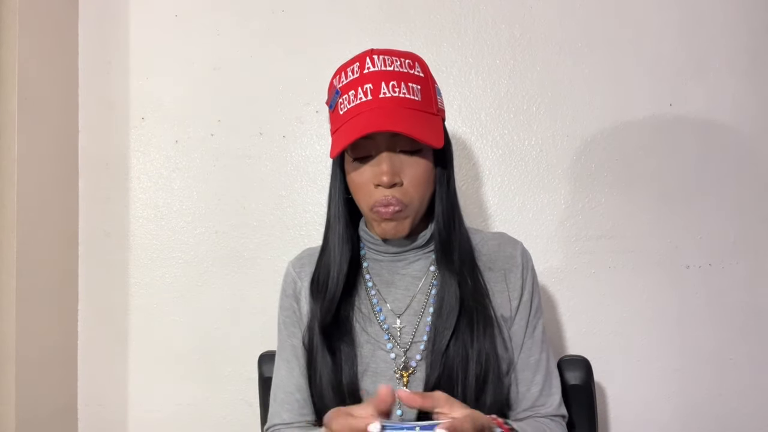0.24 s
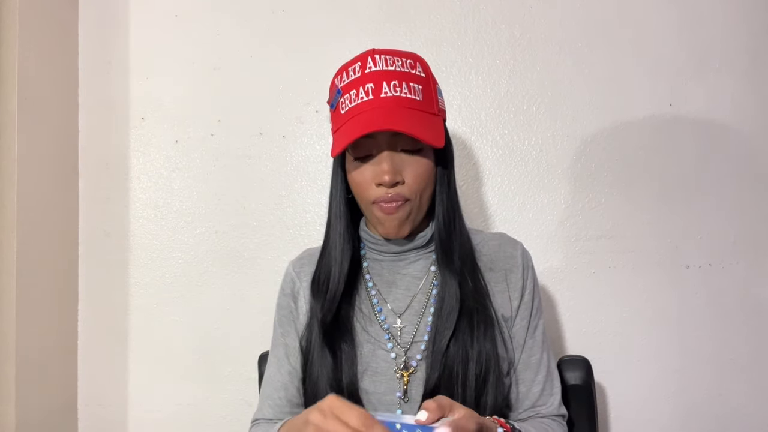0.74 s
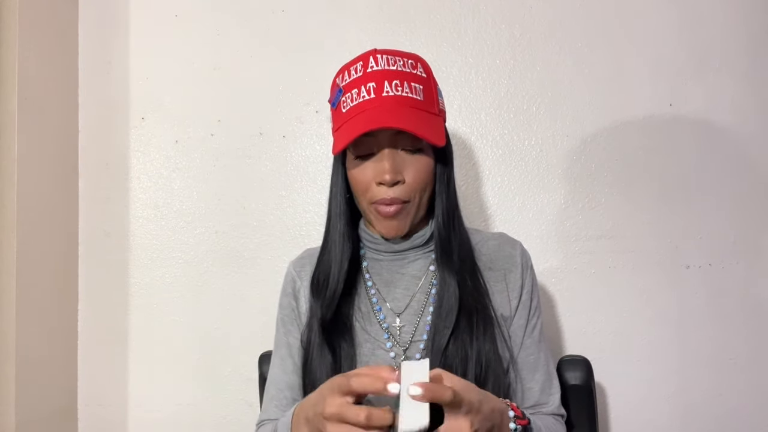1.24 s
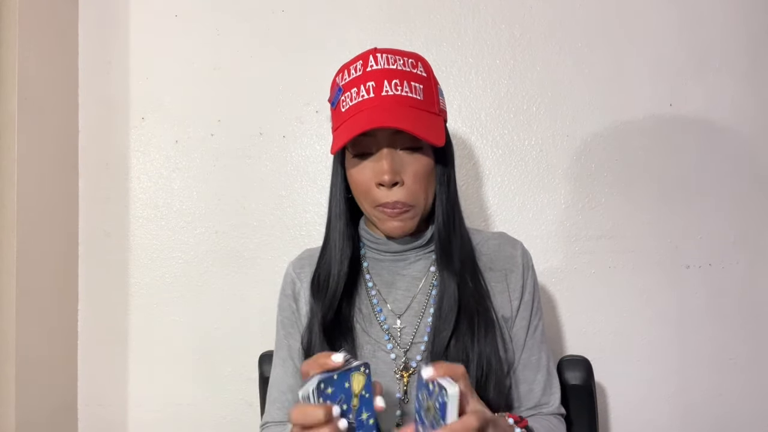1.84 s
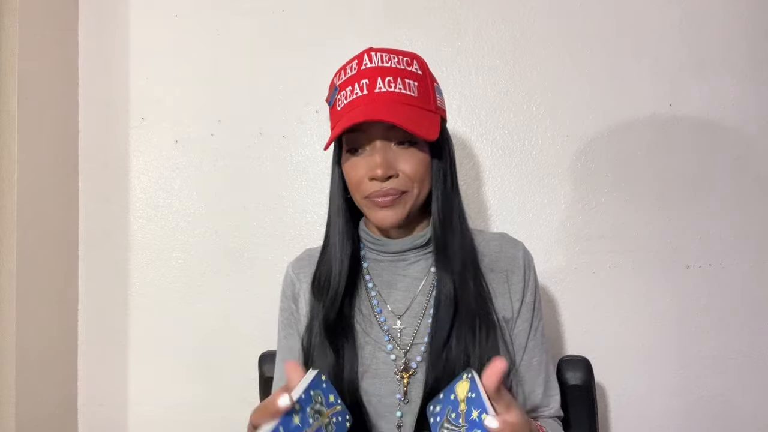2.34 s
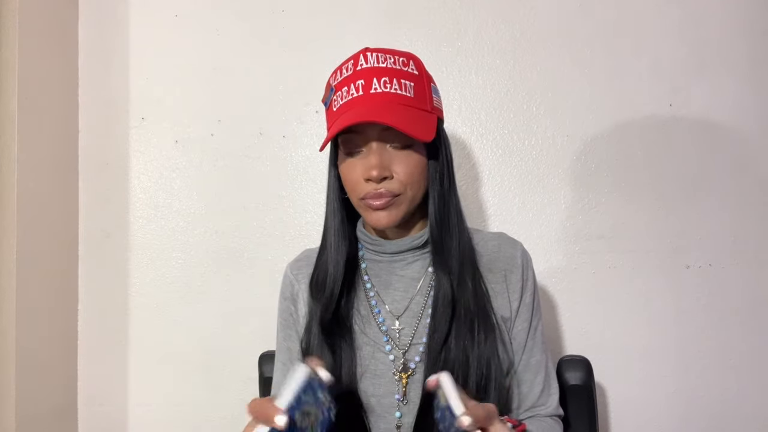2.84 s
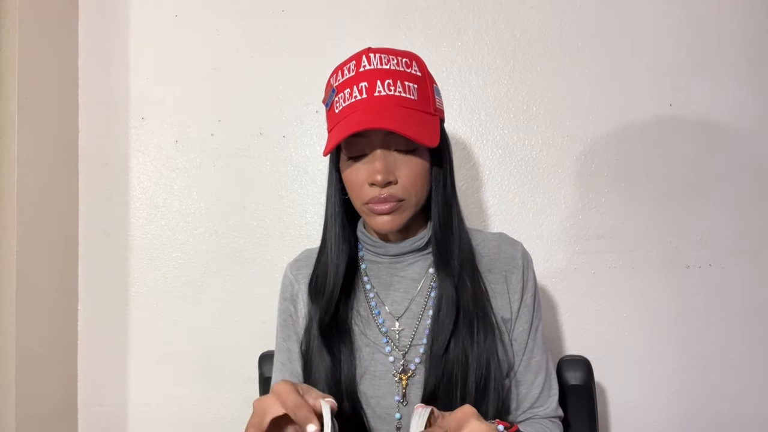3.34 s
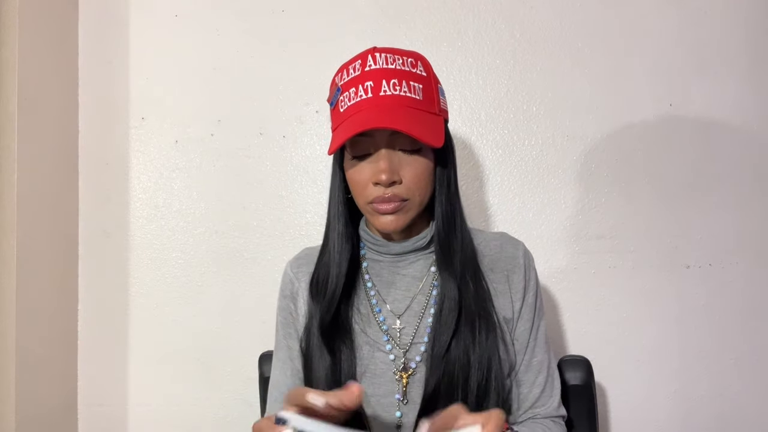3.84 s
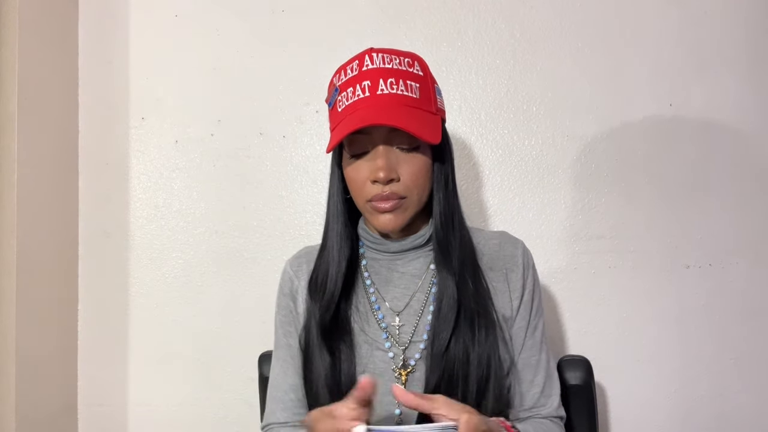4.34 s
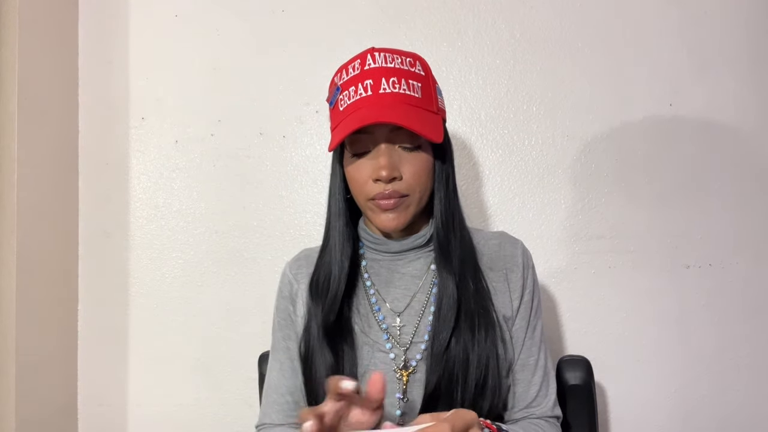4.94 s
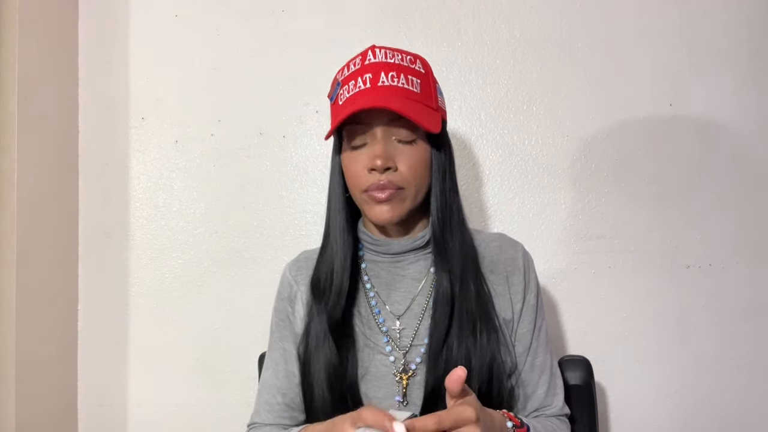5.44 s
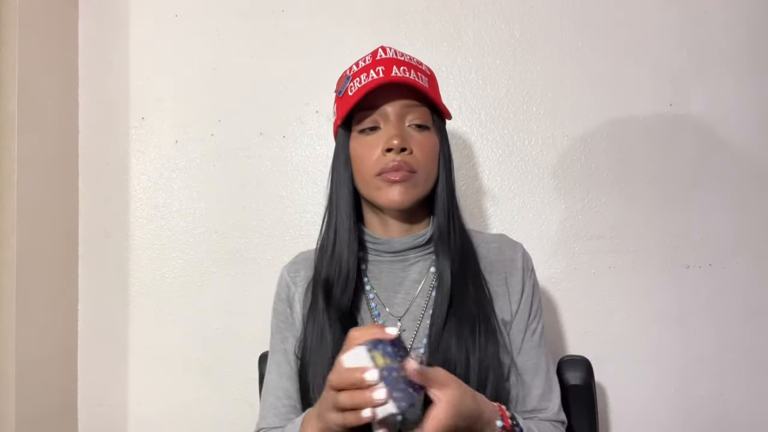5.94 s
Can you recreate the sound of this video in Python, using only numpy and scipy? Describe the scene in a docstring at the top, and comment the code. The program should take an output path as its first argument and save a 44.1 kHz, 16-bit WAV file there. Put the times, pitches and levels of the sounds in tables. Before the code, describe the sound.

A deck of cards is handled on a wooden table in a small quiet room, heard close, slightly right, with a short echo. From 0 to 0.3 seconds, soft muffled pops, light table knocks and a papery hiss; to 0.8, fading slides. From 0.9 to 1.8 only faint ticks and scrapes. At 1.93 a dull knock with a pop, then near silence until 2.95. From 2.98 to 3.75 comes the loudest card passage: rapid irregular snaps, noisy flutters, crisp bright ticks, rushing hiss and brief high squeaks, the table ringing woodily, densest around 3.5 to 3.65. From 3.9 to 4.65, gentler slides, pops and squaring taps. Sparse faint rustles follow, with a small tap at 5.27. At 5.64 a heavy, low double thump hits the table. Around 6.05, a short slide and snap. A low wavering hum, faint rumble and soft hiss continue throughout.

```python
"""Shuffling cards on a table

Hands cut, riffle and square a deck of cards on a wooden table in a small quiet room.
Cards snap with short pops and noisy flutters, edges tick and squeak, and sliding faces hiss.
Blows ring the table top; a wavering hum, a faint rumble and microphone hiss lie underneath.
Two microphone ports a few centimetres apart hear the cards from one side, with a short echo."""
import sys
import numpy as np
from scipy import signal
from scipy.fft import rfft, irfft, next_fast_len
from scipy.io import wavfile
from scipy.ndimage import uniform_filter1d

SR = 44100
rng = np.random.default_rng(int(sys.argv[2]) if len(sys.argv) > 2 else 0)


def wav_out(sig):
    """Save sig, one row per channel (or a flat mono array), as 16-bit PCM at SR to the path in sys.argv[1]."""
    wavfile.write(sys.argv[1], SR, np.round(np.clip(np.atleast_2d(sig).T, -1, 1) * 32767).astype(np.int16))


N = 272979  # length of the scene in samples

# colour of the bending stack of cards: (frequency [Hz], relative level per Hz [dB])
STACK = [(150, -5), (350, -2), (700, -4), (1300, -2.5), (1900, -4), (2600, -9), (4500, -32.5)]
ENDS_DB = -24  # a stroke or squeak is this far below its peak one rise before or one fall after it


def amp(db):
    """Turns decibels into a plain multiplier."""
    return 10 ** (np.asarray(db) / 20)


def evened(x):
    """Scales a signal to an rms level of one."""
    return x / np.sqrt(np.mean(x ** 2) + 1e-20)


def read(points, hz):
    """Reads a table between its points, along a logarithmic frequency scale."""
    f, value = np.transpose(points)
    return np.interp(np.log(hz + 1), np.log(f + 1), value)


def add(mix, s, sound):
    """Adds a sound to the mix, starting at s seconds."""
    part = mix[max(round(s * SR), 0):][:len(sound)]
    part += sound[:len(part)]


def coloured(x, points):
    """Filters x by the levels in the table and scales it to an rms level of one."""
    size = next_fast_len(len(x))
    gain = amp(read(points, np.fft.rfftfreq(size, 1 / SR)))
    return evened(irfft(rfft(x, size) * gain, size)[:len(x)])


def low_hum():
    """A low sine wavers in level and drifts slightly in pitch."""
    # level of the hum: (time [s], level [dB])
    hum_levels = [(0, -50), (.55, -49), (.74, -54), (.8, -62), (.88, -53), (1.9, -50), (2.55, -50),
                  (2.68, -62), (2.8, -52), (2.88, -60), (3., -52), (4., -52), (4.4, -49), (4.8, -55),
                  (5.15, -49.5), (5.55, -54), (6.19, -52)]
    hum_hz, drift_hz = 59.5, 0.34
    t = np.arange(N) / SR
    drift = evened(uniform_filter1d(uniform_filter1d(rng.standard_normal(N), 6000), 6000))
    turns = np.cumsum(hum_hz + drift_hz * drift) / SR
    level = np.sqrt(2) * amp(np.interp(t, *np.transpose(hum_levels)))
    return level * np.sin(2 * np.pi * turns) * amp([[-.5], [.5]])  # a little louder on the right


def quiet_room():
    """Faint low rumble: one noise shared by both ports plus one of each port's own."""
    # colour of the rumble: (frequency [Hz], relative level per Hz [dB])
    rumble_colour = [(12, -87.5), (20, -35), (41, -17.5), (65, -28), (92, -14), (129, -18.5), (177, -27.5),
                     (258, -26), (376, -38), (505, -43), (768, -49.5), (3000, -65), (6600, -120)]
    shared, left, right = (coloured(v, rumble_colour) for v in rng.standard_normal((3, N)))
    return amp(-64.5) * (shared + 1.21 * np.array([left, right]))


def microphone_hiss():
    """Each microphone adds its own steady noise."""
    # colour of the hiss: (frequency [Hz], relative level per Hz [dB])
    hiss_colour = [(1000, -19), (3000, -4.5), (6000, -2.5), (8500, -7), (12000, -2.5), (14500, -19.5)]
    return amp(-84) * np.array([coloured(v, hiss_colour) for v in rng.standard_normal((2, N))])


def gritty(per_s, spread_db, share):
    """Noise that swells with tiny catches of uneven size, as rough surfaces slide."""
    sizes = amp(spread_db * np.minimum(rng.exponential(1, N), 3))
    catches = sizes * (rng.random(N) < per_s / SR)
    swell = evened(signal.lfilter([1], [1, -.97], catches))
    return (1 + share * swell) * rng.standard_normal(N)


def patchy(x):
    """Friction is uneven: patches of the spectrum swell and sink at random."""
    patchy_db = 2.5  # typical size of the swelling and sinking
    z = signal.stft(x, nperseg=256)[2]
    patches = uniform_filter1d(rng.standard_normal(z.shape), size=5, axis=0)
    patches = evened(uniform_filter1d(patches, size=9, axis=1))
    return signal.istft(z * amp(patchy_db * patches), nperseg=256)[1][:N]


def sliding_cards():
    """Faces hiss over each other; the bending stack rustles lower down. Each stroke swells and fades."""
    # strokes of sliding cards: (peak time [s], rise [s], fall [s], level of the hiss [dB],
    # level of the rustle above the hiss [dB])
    strokes = [(0, .05, 0.24, -55, 5), (.095, 0.041, 0.1, -61.5, 7.5), (0.172, 0.055, 0.068, -38, -5),
               (.3, 0.14, 0.094, -58.5, -1.5), (.45, 0.13, 0.084, -59.5, -4.5),
               (.655, 0.11, 0.11, -53.5, -2), (0.768, 0.15, 0.19, -61.5, -4), (.99, 0.051, 0.094, -66, 3),
               (1.06, 0.032, 0.08, -64.5, -17), (1.27, 0.074, 0.17, -70.5, -5),
               (1.46, 0.03, 0.027, -65.5, -3), (1.54, 0.098, 0.074, -72.5, -6),
               (1.74, 0.092, 0.51, -66, -9), (1.879, 0.04, 0.042, -58, -4.5),
               (1.939, 0.069, 0.11, -59.5, -0.5), (2.1, 0.061, 0.12, -75.5, -17),
               (2.31, 0.13, 0.12, -70.5, -13), (2.56, 0.3, 0.27, -72.5, -18),
               (2.79, 0.083, 0.089, -70.5, -9), (2.89, 0.033, 0.018, -70.5, -12),
               (2.999, 0.027, 0.054, -59, 19.5), (3.15, 0.1, 0.6, -37, 1.5), (3.25, 0.072, 0.36, -49.5, 1),
               (3.318, 0.022, 0.063, -30.5, 0), (3.409, 0.014, 0.13, -33.5, -3.5),
               (3.52, 0.043, 0.22, -30, -3.5), (3.6, 0.12, 0.12, -36.5, 4.5),
               (3.636, 0.028, 0.037, -25.5, -3.5), (3.68, 0.05, 0.084, -37, 4),
               (3.76, 0.05, 0.32, -54.5, 1.5), (3.959, 0.08, 0.057, -46, -12),
               (4.064, 0.12, 0.072, -55.5, -25), (4.144, 0.11, 0.11, -44.5, -9),
               (4.32, 0.07, 0.16, -46.5, 4), (4.4, 0.065, 0.19, -52, -15), (4.597, 0.062, 0.064, -53, -1),
               (4.79, 0.34, 0.29, -60, -2), (5.051, 0.12, 0.86, -62, -1.5), (5.2, 0.082, 0.25, -63.5, -1),
               (5.435, 0.068, 0.049, -49.5, -10), (5.642, 0.022, 0.09, -59.5, 18),
               (5.801, 0.08, 0.09, -78.5, 1), (5.939, 0.013, 0.092, -68, -4.5),
               (6.055, 0.05, 0.06, -44, -8), (6.074, 0.03, 0.055, -54, 17.5)]
    # colour of faces rubbing: (frequency [Hz], relative level per Hz [dB])
    face_colour = [(880, -44), (1500, -12), (2120, -10), (3060, -2.5), (4120, -1.5), (6000, 2.5),
                   (7460, -1.5), (8080, -0.5), (9850, -6.5), (12700, -6.5), (13700, -5), (14800, -34.5)]
    # level of the treble in the hiss, against its usual colour: (time [s], level [dB])
    treble_levels = [(0, -3), (.25, -3.5), (.38, 8.5), (.52, 13), (.62, -3.5), (.9, -1.5), (.99, 16),
                     (1.17, 10), (1.25, 1.5), (1.8, 1.5), (2.1, 10), (2.22, 6.5), (2.55, 13.5), (2.8, 5),
                     (3.05, 0.5), (3.36, 3.5), (3.75, -2), (4.5, 1.5), (5.3, -1.5), (5.65, -8), (5.8, 12),
                     (6.05, 6.5)]
    treble_hz = 9300  # the treble starts here
    t = np.arange(0, N, 32) / SR  # coarse time steps are enough for slow swells
    hiss_power, rustle_power = 0, 0
    for s, rise, fall, hiss_db, rustle_db in strokes:
        away = np.maximum((s - t) / rise, (t - s) / fall)  # distance from the peak, in rises or falls
        power = amp(hiss_db + ENDS_DB * away ** 1.02) ** 2
        hiss_power = hiss_power + power
        rustle_power = rustle_power + power * amp(rustle_db) ** 2
    faces = coloured(gritty(300, 5.6, 0.38), face_colour)
    stack = coloured(gritty(500, 3.0, 0.77), STACK)
    now = np.arange(N) / SR
    top = signal.sosfiltfilt(signal.butter(4, treble_hz, "high", fs=SR, output="sos"), faces)
    faces = faces + (amp(np.interp(now, *np.transpose(treble_levels))) - 1) * top
    hiss = faces * np.interp(now, t, np.sqrt(hiss_power))
    rustle = stack * np.interp(now, t, np.sqrt(rustle_power))
    return patchy(hiss + rustle)


def table_knocks(cards):
    """Blows ring the wooden top and bend the whole board; the card sounds shake it a little."""
    # deck and hands land: (time [s], strength of the blow [dB], share in the whole-board modes [dB])
    knocks = [(.004, -30.5, -5), (0.067, -35, -6), (0.092, -25.5, -10), (.215, -29.5, -13),
              (0.319, -36, -12), (.436, -43.5, -8), (1.878, -38, 7), (1.928, -20, -8.5),
              (1.945, -23.5, -22), (2.243, -47.5, -35), (2.985, -19.5, -16), (3.065, -17.5, -14.5),
              (3.149, -20, -22), (3.198, -19.5, -16.5), (3.249, -29.5, -6), (3.412, -19.5, -16),
              (3.481, -14, -27), (3.552, -20, -16), (3.587, -15.5, -39), (3.623, -14.5, -21),
              (3.71, -19, -17.5), (4.114, -30.5, -11.5), (4.151, -21.5, -8.5), (4.187, -25, -31),
              (4.301, -28.5, -29), (4.329, -28.5, -7), (4.484, -37, -9.5), (4.604, -35.5, -11),
              (5.021, -45, -10.5), (5.265, -30.5, -11), (5.635, -6.5, -20), (5.643, -19, -2.5),
              (5.651, -11, -4), (6.074, -44, -18)]
    # ringing modes of the top: (frequency [Hz], relative level [dB], time to die by 60 dB [s])
    modes = [(95.9, -8, 0.27), (138.7, 11, 0.053), (146.4, -7.5, 0.3), (178.9, -15, 0.54),
             (213, -5.5, 0.18), (273.2, -3.5, 0.024), (327, -15.5, 0.13), (375.4, -3.5, 0.089),
             (415.2, -11.5, 0.15), (521.4, -9, 0.08), (647, -12.5, 0.097), (730, -17.5, 0.036)]
    light, heavy = amp(-39.5) * cards, np.zeros(N)
    t = np.arange(SR // 2) / SR
    push = np.hanning(90)  # a soft push of about 2 ms
    push = push / push.sum()
    for s, db, weight_db in knocks:
        add(light, s, amp(db) * push)
        add(heavy, s, amp(db + weight_db) * push)
    rings = np.array([amp(db - 60 * t / t60) * np.sin(2 * np.pi * hz * t) for hz, db, t60 in modes])
    mode_hz = np.transpose(modes)[0]
    # bending waves need time to fill the board: the lower the mode, the slower it builds up
    rings *= 1 - np.exp(-np.outer(mode_hz, t) / 0.47)
    whole_board = mode_hz < 250
    wood = signal.oaconvolve(heavy, rings[whole_board].sum(0))
    wood = wood + signal.oaconvolve(light, rings[~whole_board].sum(0))
    # a small top radiates little below its lowest mode
    return signal.sosfilt(signal.butter(3, 85, "high", fs=SR, output="sos"), wood[:N])


def burst(noise, s, t60, rise):
    """A slice of noise that rises fast and dies away by 60 dB in t60 seconds."""
    t = np.arange(4000) / SR
    return noise[round(s * SR):][:len(t)] * amp(-60 * t / max(t60, .003)) * np.minimum(t / rise, 1)


def add_scattered(mix, s, level, share, noises, t60, rises):
    """Adds a burst that both ports partly share; each hears the rest on its own."""
    shared, *own = noises
    common = np.sqrt(1 - share ** 2) * burst(shared, s, t60, rises[0])
    for port, noise in zip(mix, own):
        add(port, s, level * (common + share * burst(noise, s, t60, rises[1])))


def card_snaps():
    """Cards slap together: squeezed-out air pops, the cards flutter and their stiff corners crackle."""
    # slaps: (time [s], level of the pop [dB], pitch of the pop [Hz], corner crackle above the pop [dB])
    slaps = [(.0412, -30.5, 940, -24.5), (0.0687, -23, 1300, -23), (.071, -23, 810, -39),
             (.0872, -26, 1220, -17.5), (.0905, -24, 680, -41), (0.1007, -27, 940, -34),
             (.215, -38.5, 724, -8), (.28, -38, 910, -23), (0.315, -47.5, 1290, -19),
             (.483, -51, 1500, -29), (0.748, -49, 1430, -14), (0.909, -55, 1620, 6.5),
             (1.031, -53, 1200, -8), (1.054, -54, 1330, -6), (1.236, -42, 1090, -13), (1.4, -49, 1230, -39),
             (1.868, -51, 1150, -1), (1.929, -25.5, 990, -12), (2.243, -60, 1025, -4),
             (2.987, -24.5, 793, -2), (3.063, -26, 780, -4.5), (3.097, -8.5, 1249, -13),
             (3.111, -25, 1530, -18.5), (3.126, -27.5, 1600, -16.5), (3.138, -28.5, 960, -6),
             (3.149, -15.5, 927, -14), (3.161, -25, 998, -15.5), (3.187, -17, 1070, -8),
             (3.199, -28.5, 656, -25), (3.224, -17, 1280, -6.5), (3.251, -21, 1480, -9),
             (3.277, -19.5, 1110, -8.5), (3.292, -24, 1230, -9), (3.305, -24.5, 1160, -8),
             (3.314, -23.5, 970, -1.5), (3.322, -21, 1300, -1), (3.345, -23.5, 1180, -4.5),
             (3.358, -19, 1150, -6.5), (3.384, -30.5, 597, -16), (3.4056, -15, 1450, -16.5),
             (3.413, -21, 1160, -8), (3.4322, -18.5, 1220, -6.5), (3.4358, -19, 1016, -17.5),
             (3.458, -24, 1310, -9), (3.48, -12, 1140, -5.5), (3.488, -24.5, 1280, -8.5),
             (3.502, -9.5, 1910, -7), (3.514, -21, 1227, -3.5), (3.526, -21.5, 689, -7.5),
             (3.533, -28.5, 1200, -9), (3.551, -14, 1520, -6), (3.566, -19, 1107, -8), (3.589, -14, 590, 1),
             (3.596, -11, 1244, -26), (3.606, -18.5, 1713, -10), (3.628, -20, 730, 4),
             (3.64, -24, 580, -9.5), (3.667, -21.5, 670, -8), (3.678, -22, 780, -8), (3.706, -17, 1125, -5),
             (3.729, -15, 1280, -9), (3.923, -40.5, 1370, -16), (3.963, -34.5, 1300, -6.5),
             (4.115, -31, 850, -11), (4.1493, -23, 1030, -35), (4.155, -29, 1020, -35),
             (4.16, -27, 617, -33), (4.188, -31.5, 1230, -19), (4.27, -38, 720, -27),
             (4.292, -33, 680, -17), (4.303, -25.5, 1130, -15), (4.321, -35.5, 970, 2.5),
             (4.36, -36.5, 726, -22), (4.382, -38, 1120, -22.5), (4.42, -41, 1060, -8),
             (4.598, -39, 1010, -24), (4.606, -37, 960, -26), (4.632, -46.5, 595, -20),
             (4.827, -52, 963, 1), (5.27, -48, 957, -13), (5.623, -45, 1470, -4), (5.635, -23, 592, -15.5),
             (5.641, -22.5, 913, -21), (5.657, -23.5, 754, -26), (6.0458, -34.5, 1400, -22),
             (6.0737, -26, 640, -7), (6.079, -28.5, 1110, -9), (6.0855, -36, 857, -16)]
    # colour of the stiff corners: (frequency [Hz], relative level per Hz [dB])
    corner_colour = [(1200, -16.5), (2000, -4.5), (3000, -5), (4200, -11), (6500, -27)]
    pop_db_per_turn = 12  # the pop dies this much in each cycle
    flutter_db, flutter_top = -6.5, 1.63  # level against the pop; upper limit in multiples of its pitch
    flutter_t60, softer = 0.042, 0.12  # seconds at 0 dB, shrinking with this power of the strength
    corner_t60_share, corner_scatter = 0.9, 0.81  # share of flutter time; share heard by one port alone
    out, corners, t = np.zeros(N), np.zeros((2, N)), np.arange(1000) / SR
    dull = coloured(rng.standard_normal(N + SR), STACK)
    crisp = [coloured(rng.standard_normal(N + SR), corner_colour) for _ in range(3)]
    for s, db, hz, crisp_db in slaps:
        turns = hz * t
        t60 = flutter_t60 * amp(db) ** softer
        pop = np.sin(2 * np.pi * turns) * turns * amp(pop_db_per_turn * (1 - turns))
        add(out, s, amp(db) * pop)
        lowpass = signal.butter(2, flutter_top * hz, fs=SR)
        flutter = signal.lfilter(*lowpass, burst(dull, s, t60, 0.0026))
        add(out, s, amp(db + flutter_db) * flutter)
        add_scattered(corners, s, amp(db + crisp_db), corner_scatter, crisp,
                      corner_t60_share * t60, (0.0017, 0.0016))
    return out + corners


def edge_ticks():
    """Card edges slip off the thumbs with brief bright scratches of noise."""
    # slips: (time [s], level [dB])
    slips = [(0.2911, -39.5), (0.4826, -44.5), (0.9656, -46), (1.0323, -49), (1.0538, -52), (1.108, -54),
             (1.154, -49), (1.238, -49.5), (1.2843, -41.5), (1.772, -49), (1.925, -47), (2.158, -58),
             (2.9432, -60.5), (2.9577, -34.5), (2.9841, -20.5), (3.065, -19), (3.0949, -19.5),
             (3.1232, -37), (3.14, -20), (3.159, -22.5), (3.1866, -19), (3.222, -23), (3.251, -24.5),
             (3.271, -26.5), (3.29, -23.5), (3.317, -24), (3.3223, -15.5), (3.332, -22), (3.406, -16),
             (3.4104, -16), (3.4335, -17), (3.4787, -9.5), (3.5028, -9), (3.551, -32.5), (3.5875, -13.5),
             (3.6314, -20.5), (3.706, -25.5), (3.7298, -21), (3.927, -40), (3.9583, -31.5), (4.063, -39),
             (4.281, -48), (4.319, -31), (4.381, -40), (4.781, -42.5), (5.9308, -49), (6.048, -35.5),
             (6.0703, -25.5)]
    # colour of a tick: (frequency [Hz], relative level [dB])
    tick_colour = [(1500, -5.5), (3000, -15.5), (5000, 6.5), (8000, 3), (12000, 0), (13800, 3.5),
                   (15200, -14), (16500, -17)]
    tick_t60, tick_scatter = 0.013, 0.44  # seconds; share heard by one port alone
    out = np.zeros((2, N))
    bright = [coloured(rng.standard_normal(N + SR), tick_colour) for _ in range(3)]
    for s, db in slips:
        add_scattered(out, s, amp(db), tick_scatter, bright, tick_t60, (0.00064, 0.00074))
    return out


def edge_squeaks():
    """Scraping edges squeak: noise in one narrow band swells and fades like a stroke."""
    # scrapes: (peak time [s], rise [s], fall [s], pitch [Hz], width of the band [Hz], level [dB])
    scrapes = [(.94, 0.011, 0.012, 2970, 300, -63), (1.29, 0.017, 0.021, 2080, 402, -64),
               (1.52, 0.028, 0.055, 1840, 448, -66.5), (3.165, .01, 0.011, 2130, 401, -26.5),
               (3.321, 0.014, 0.021, 3650, 598, -25), (3.35, 0.018, 0.043, 3610, 492, -35),
               (3.521, .015, 0.068, 2790, 605, -30.5), (3.6, 0.011, .015, 3150, 504, -24.5),
               (3.634, 0.0084, 0.012, 2920, 500, -20), (3.67, .02, 0.093, 2830, 501, -33.5),
               (3.744, .012, 0.031, 1530, 400, -32), (3.79, 0.044, 0.066, 2970, 507, -48),
               (3.96, 0.033, 0.018, 5300, 1790, -44), (4.2, .015, 0.05, 2080, 400, -53)]
    t, out = np.arange(N) / SR, np.zeros(N)
    noise = rng.standard_normal(N)
    for s, rise, fall, hz, width, db in scrapes:
        part = slice(round((s - 3 * rise) * SR), round((s + 3 * fall) * SR))
        away = np.maximum((s - t[part]) / rise, (t[part] - s) / fall)
        band = signal.butter(2, [hz - width / 2, hz + width / 2], "band", fs=SR, output="sos")
        out[part] += amp(db + ENDS_DB * away) * evened(signal.sosfilt(band, noise[part]))
    return out


def ports(x):
    """The direct sound reaches the right port first and, at most pitches, a little louder."""
    # level difference: (frequency [Hz], left minus right [dB])
    tilt = [(60, -1), (400, -1), (700, -2.6), (1500, -1.2), (3000, -1.6), (5500, -4.5), (9000, -1),
            (15000, 0)]
    # delay of the left port behind the right: (frequency [Hz], phase lag [radians])
    lag = [(0, 0), (860, .3), (2000, 1.1), (3000, 1.5), (3800, 2.1), (6600, 2.3), (8300, 3.1), (9500, 4.4),
           (11000, 6), (12500, 7), (14100, 8.2), (17000, 9.5)]
    size = next_fast_len(N + 2048)
    hz = np.fft.rfftfreq(size, 1 / SR)
    half = amp(read(tilt, hz) / 2)
    late = np.exp(-1j * np.interp(hz, *np.transpose(lag)))
    return irfft(rfft(x, size) * np.array([half * late, 1 / half]), size)[:, :N]


def room_echo(x):
    """Sparse echoes of random sign, each band dying at its own speed; bass is alike at both ports."""
    # strength of the echo: (frequency [Hz], relative level [dB])
    walls = [(150, -1.5), (600, 2.5), (2000, 0.5), (5000, 0.5), (9000, -10), (15000, -4)]
    # how long the echo lasts: (frequency [Hz], time to die by 60 dB [s])
    decay = [(150, 0.42), (500, 0.25), (2000, 0.18), (8000, 0.22)]
    taps = np.zeros((2, SR // 2))
    at = np.arange(160, SR // 2 - 20, 20)  # one echo at a random spot in every 20 samples
    spots = at + rng.integers(0, 20, (2, len(at)))
    np.put_along_axis(taps, spots, rng.choice([-1., 1.], (2, len(at))), 1)
    hz, t, z = signal.stft(taps, SR, nperseg=256)
    same = 1 / (1 + (hz[:, None] / 330) ** 2)  # likeness of the two ports
    z = np.array([z[0], same * z[0] + np.sqrt(1 - same ** 2) * z[1]])
    fade = amp(read(walls, hz)[:, None] - 60 * t / read(decay, hz)[:, None])
    tail = signal.istft(z * fade, SR, nperseg=256)[1]
    return signal.fftconvolve(x[None], tail / np.linalg.norm(tail[0]), axes=1)[:, :N]


def scene():
    """Adds the direct sounds of cards and table, their echo and the quiet background."""
    background = low_hum() + quiet_room() + microphone_hiss()
    cards = card_snaps() + edge_ticks()
    near = cards + sliding_cards() + edge_squeaks()
    wood = table_knocks(cards[0])
    echo = room_echo(amp(-8.5) * near[0] + amp(-11.0) * wood)
    return ports(near + wood) + echo + background


def record(dry):
    """A steep low-pass filter removes the sound above about 16.4 kHz."""
    lowpass = signal.firwin(511, 16400, window=("kaiser", 9), fs=SR)
    return signal.oaconvolve(dry, lowpass[None], "same")


dry = scene()
out = record(dry)
wav_out(out)
```